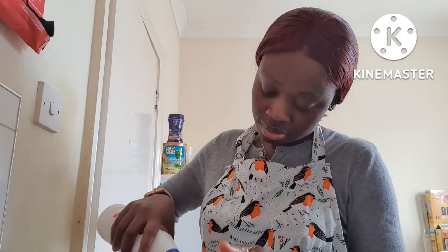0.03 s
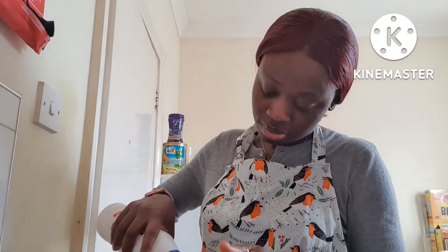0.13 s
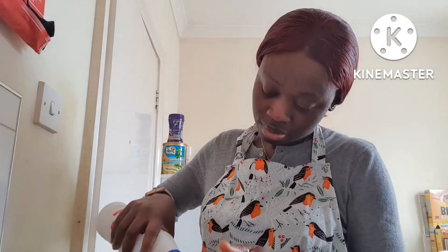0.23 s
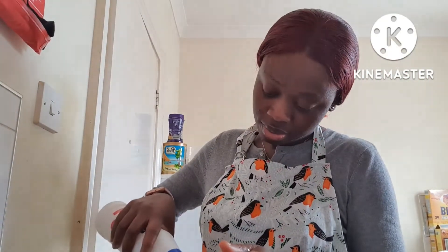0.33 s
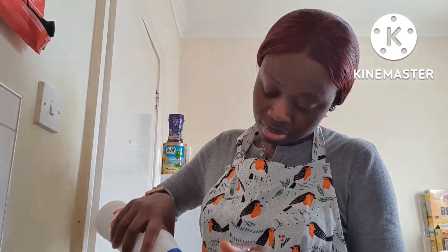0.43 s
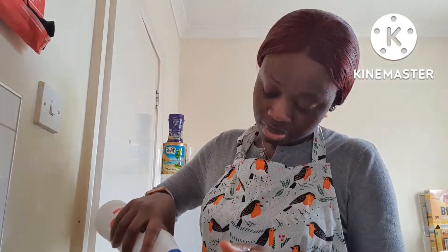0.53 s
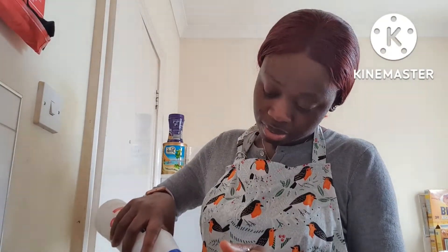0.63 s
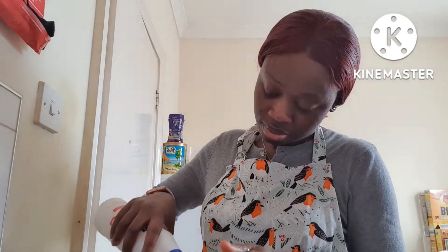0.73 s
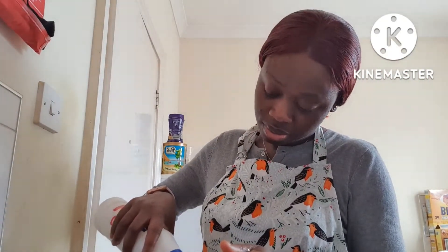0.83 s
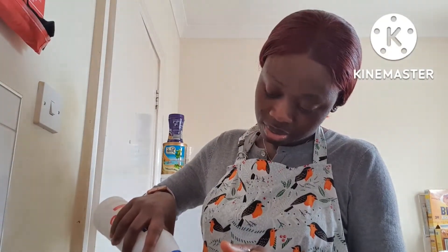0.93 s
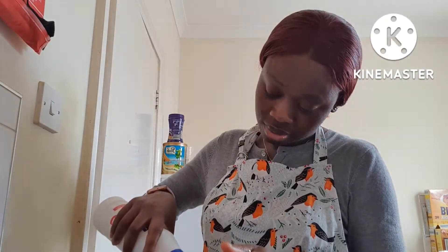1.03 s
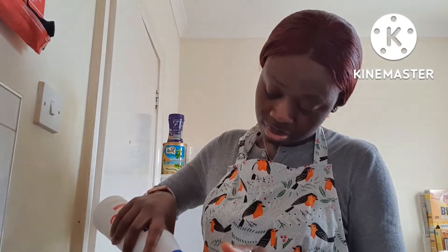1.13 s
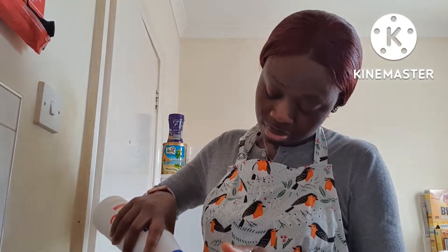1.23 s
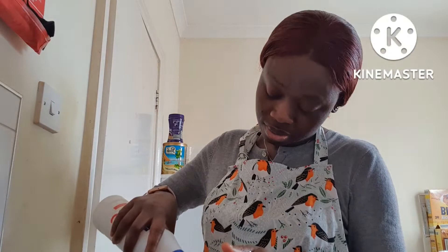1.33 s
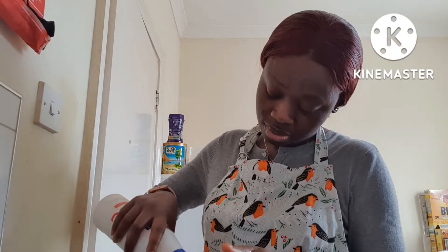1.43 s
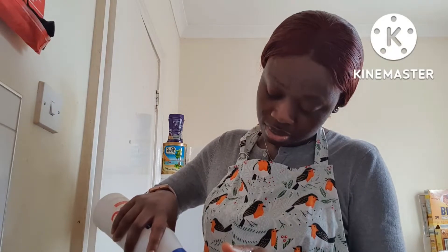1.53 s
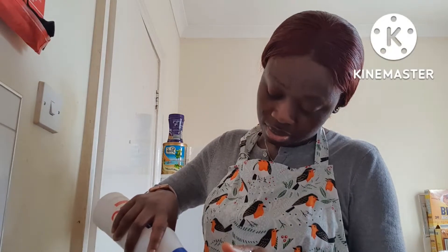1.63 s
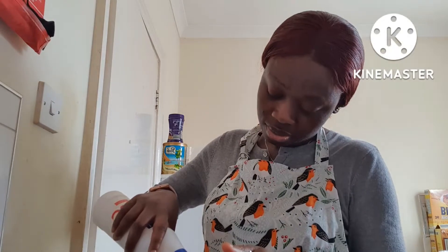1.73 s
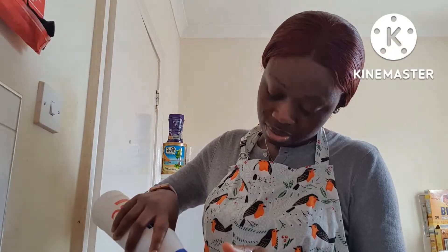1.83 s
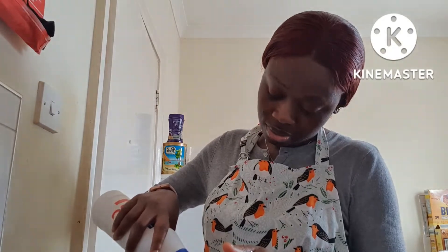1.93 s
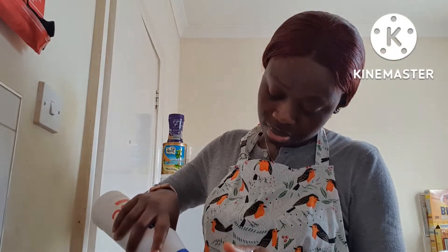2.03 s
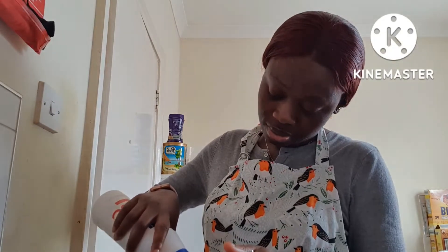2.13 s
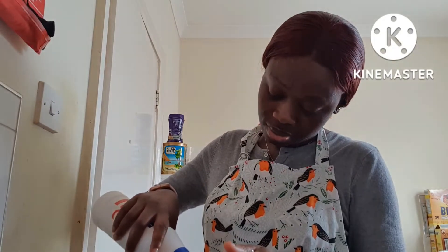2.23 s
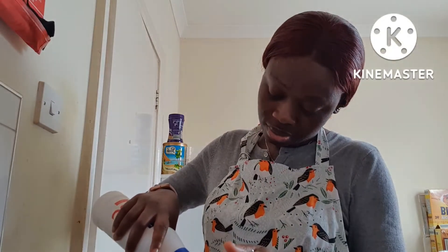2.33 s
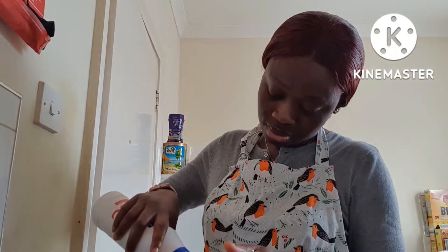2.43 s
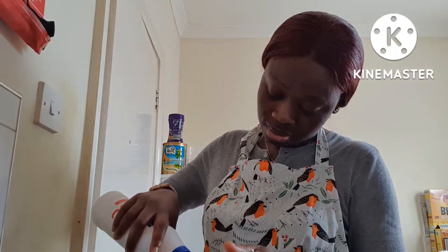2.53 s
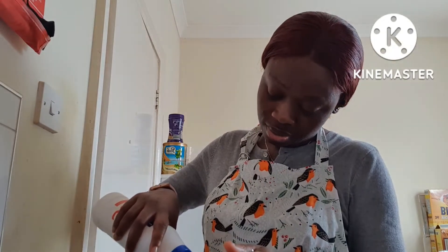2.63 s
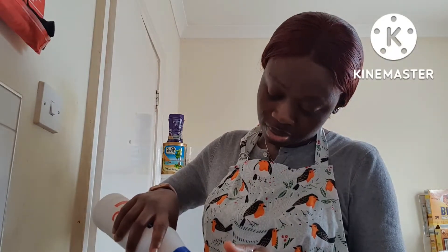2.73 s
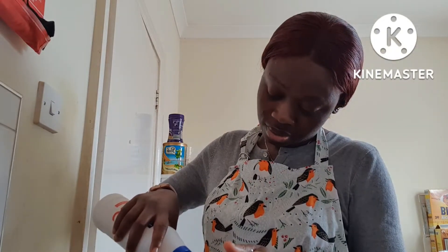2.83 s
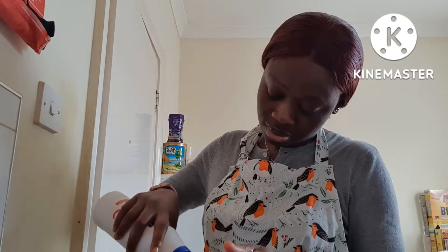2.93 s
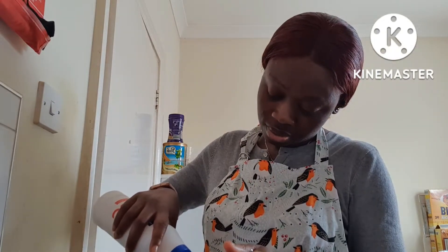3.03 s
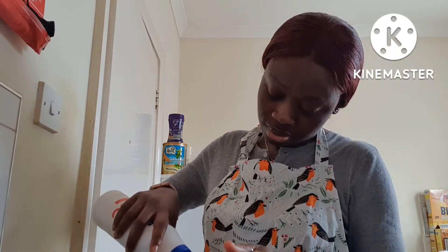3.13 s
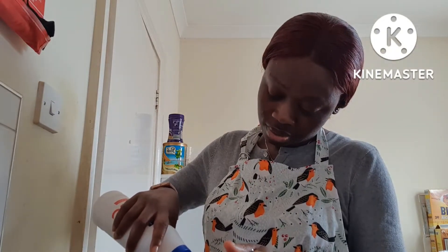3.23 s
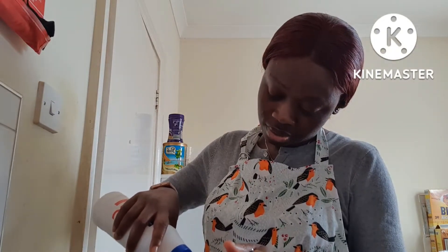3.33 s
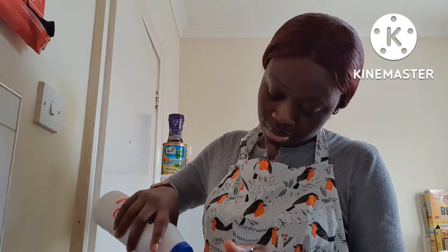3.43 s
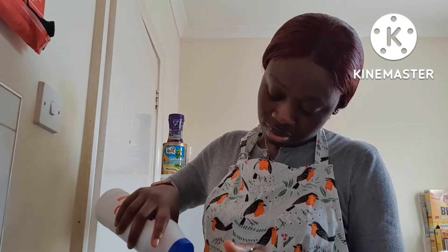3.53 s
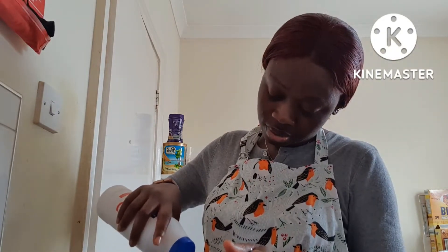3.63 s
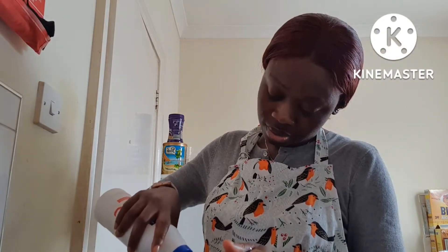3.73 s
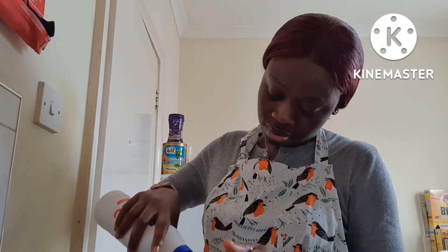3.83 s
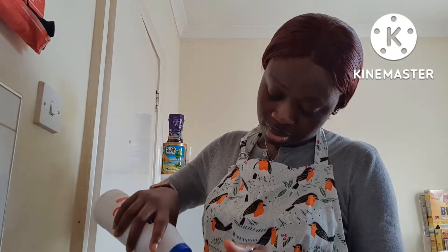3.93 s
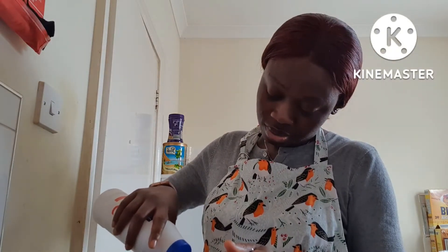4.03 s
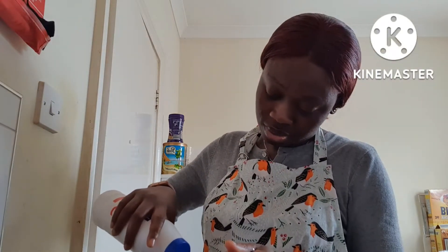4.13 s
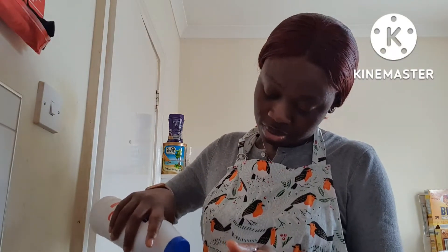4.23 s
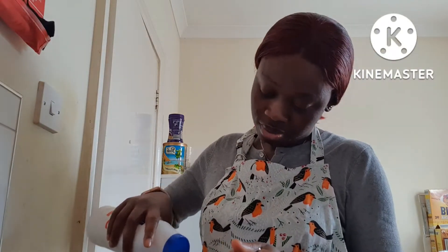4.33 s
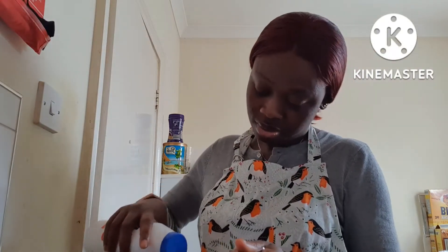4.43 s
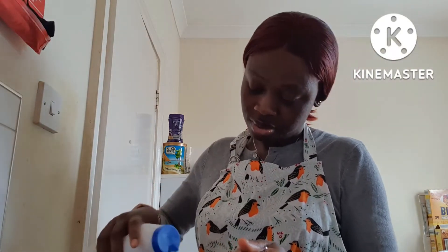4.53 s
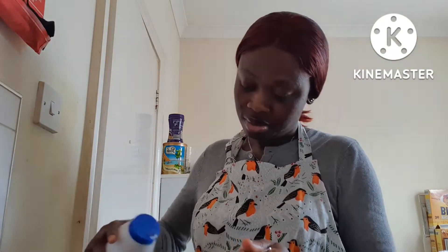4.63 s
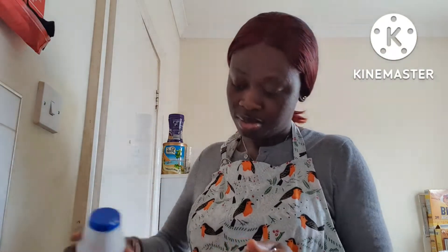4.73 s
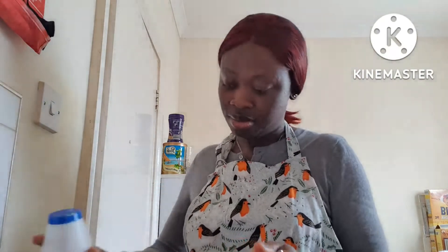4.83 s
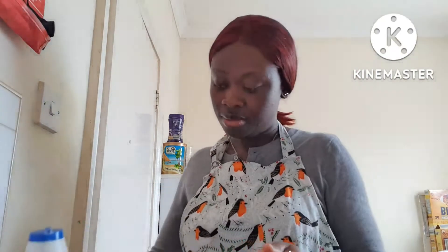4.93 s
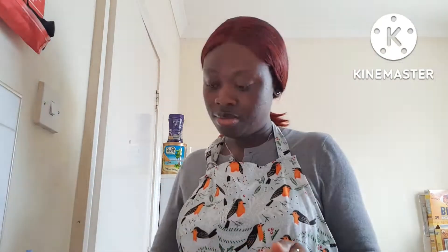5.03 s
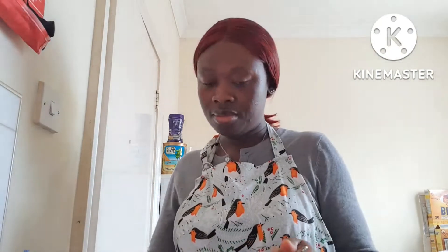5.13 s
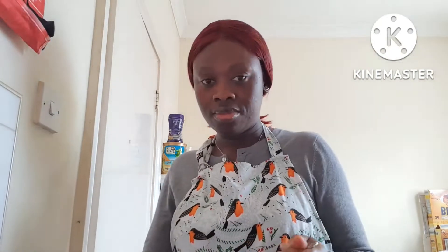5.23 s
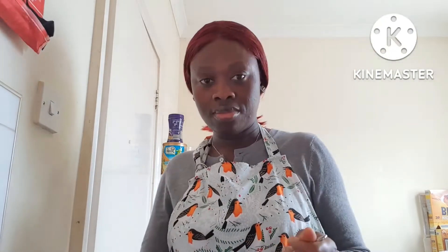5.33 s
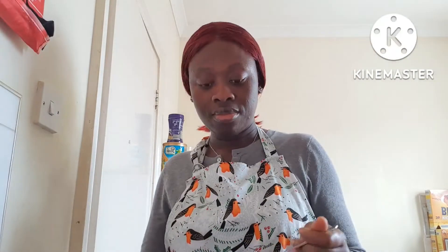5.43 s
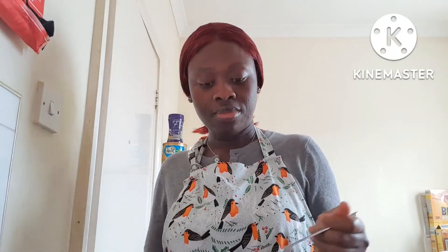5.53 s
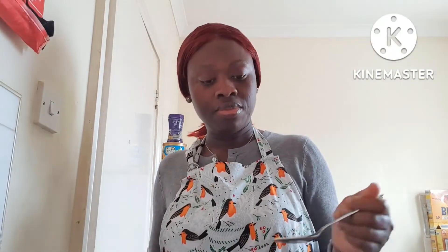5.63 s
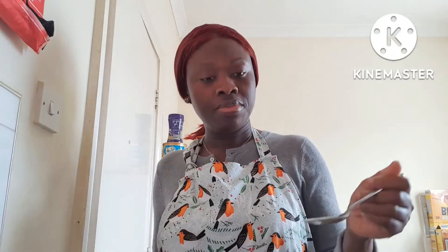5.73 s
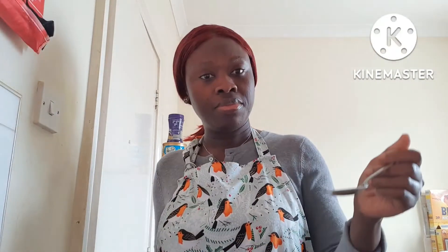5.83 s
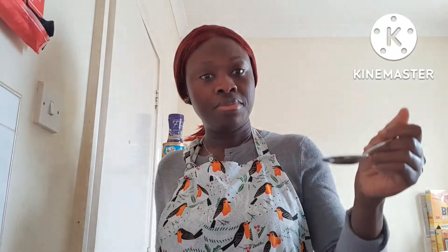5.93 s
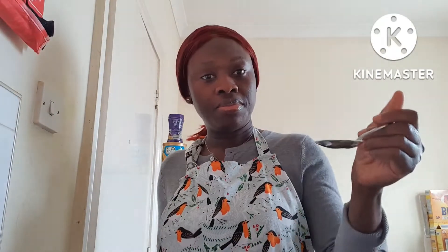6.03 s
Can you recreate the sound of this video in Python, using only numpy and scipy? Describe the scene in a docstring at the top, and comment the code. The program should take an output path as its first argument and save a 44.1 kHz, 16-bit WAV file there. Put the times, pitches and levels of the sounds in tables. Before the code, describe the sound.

A faint hiss and small shakes of salt in a plastic bottle, then a brief rush and a loud thud on a kitchen worktop.

```python
"""Salt slides along a tilted plastic bottle in a small kitchen, first in a stream, then in short shakes. Tiny
crystal impacts merge into a hiss, coloured by the air in the bottle, over the drumming of its wall. The bottle
is turned upright, the salt rushes back, and the bottle is knocked down on the worktop that carries the
microphone: a thud, a woody knock and a click. A few light bumps, a soft scrape as the hand lets go and sleeve
rustles follow; a fridge hums throughout."""
import sys
import numpy as np
from scipy import signal
from scipy.fft import rfft, irfft, next_fast_len
from scipy.io import wavfile
from scipy.ndimage import map_coordinates

SR = 44100
rng = np.random.default_rng(int(sys.argv[2]) if len(sys.argv) > 2 else 0)


def digitize_waveform(pressure):
    """Quantize a signal to 16-bit integers and store it at the path in sys.argv[1].

    Rows of a 2-D input are taken as channels; values are limited to [-1, 1].
    """
    field = np.atleast_2d(pressure).T
    bounded = np.clip(field, -1, 1)
    quanta = np.round(bounded * 32767).astype(np.int16)
    wavfile.write(sys.argv[1], SR, quanta)


N = 268657

# stereo image of diffuse sound: (frequency [Hz], left-right likeness [-1 to 1])
STEREO_LIKENESS = [(60, 0.99), (120, 0.95), (200, 0.6), (380, 0.58), (700, 0.33), (1300, -0.068),
                   (2400, 0.019), (15000, -0.082)]
# the fridge motor's tones: (frequency [Hz], rms level [dB])
FRIDGE_TONES = [(75.4, -63.5), (150.7, -64.5), (199.2, -70), (242.2, -80), (296.1, -68), (414.5, -71.5),
                (441.4, -66.5), (489.9, -78)]
# room tone, a low rumble and the air above it: (frequency [Hz], relative level [dB])
RUMBLE_COLOUR = [(20, -21), (35, -12), (50, 0), (72, 2), (95, 0), (120, -9), (150, -7), (200, -10),
                 (260, -17), (295, -11), (340, -17), (430, -12.5), (520, -17), (620, -29), (900, -55)]
AIR_COLOUR = [(500, -6.5), (650, -5), (800, -3), (1050, 0), (1200, -0.5), (1350, -16.5), (2100, -17.5),
              (3200, -22), (5000, -30.5), (8000, -36.5), (15500, -37)]
# envelope of the opening stream towards the spout: (time [s], level [dB])
STREAM_ENVELOPE = [(0.05, -79), (0.188, -58), (0.428, -56.5), (0.492, -62), (0.564, -59), (0.62, -66.5),
                   (0.762, -63), (0.888, -54), (0.978, -51), (1.038, -57), (1.138, -52), (1.3, -65.5)]
# each shake sends a small load along the wall: (time of full flow [s], level [dB], rise [s], hold [s])
SHAKE_CUES = [(1.339, -65, .02, 0.014), (1.445, -66.5, 0.02, 0.018), (1.56, -66, 0.031, 0.027),
              (1.682, -68, 0.023, .02), (1.758, -65.5, .028, 0.034), (1.883, -66.5, 0.039, 0.087),
              (2.109, -60.5, 0.036, .01), (2.269, -64.5, 0.028, 0.021), (2.627, -67, .02, .008),
              (2.749, -65.5, 0.02, 0.01), (3.487, -72.5, 0.019, .008), (3.699, -54.5, 0.017, 0.023)]
# hiss of sliding salt and the wall's dull drumming under it: (frequency [Hz], relative level [dB])
SLIDE_EQ = [(100, -12), (200, -10), (400, -3), (650, -9), (1000, -3.5), (1400, -12), (2100, -4.5),
            (3000, -1.5), (4200, -2.5), (6500, -6), (7900, -10.5), (8700, -9.5), (15500, -14)]
WALL_COLOUR = [(25, -25), (50, -10), (70, 8.5), (110, -6.5), (200, -6.5), (330, -12), (600, -25),
               (1200, -32)]
# air resonances of the bottle: (frequency [Hz], width [Hz], level against the hiss [dB])
BOTTLE_RESONANCES = [(1640, 33, -11.5), (2158, 34, 3), (2930, 170, -10.5), (4060, 150, -17),
                     (3930, 210, -1), (4970, 48, -7), (5340, 83, -13), (8800, 270, -25)]
# salt drops to the bottom, then settles: (time of full flow [s], level [dB], rise [s], hold [s])
FALL_CUES = [(4.832, -41, 0.067, 0.12), (5.245, -65.5, 0.025, .04)]
# hiss of falling salt: (frequency [Hz], relative level [dB])
FALL_EQ = [(300, -12.5), (700, -21), (1100, -14), (1400, -18), (1900, -12), (2500, -8), (3400, -5.5),
           (4300, -2), (5500, -6.5), (6800, -6.5), (8000, -12.5), (10500, -11.5), (15500, -14.5)]
# the bottle lands, rocks and is nudged: (time [s], thud gain [dB], knock gain [dB], click gain [dB])
CONTACT_CUES = [ (5.091, -11.7, -19.3, -22), (5.147, -27, -30.5, -44), (5.183, -30.5, -33, -39),
                (5.242, -35, -35, -50), (5.276, -34.5, -33.5, -47), (5.3025, -33, -32, -34.5),
                (5.424, -39.5, -41.5, -60), (5.433, -32, -46, -66), (5.463, -54, -39.5, -58),
                (5.48, -36, -53, -56)]
# the worktop's bending modes, and the knock of bottle on board: (frequency [Hz], level [dB], t60 [s])
WORKTOP_MODES = [(71, -1.5, .45), (110, 2.5, .15), (149, -7, .25), (195, -5, .06)]
KNOCK_MODES = [(325, -3, 0.214), (333, -3, 0.09), (384, -0.5, 0.17), (454, -5, 0.11), (498, -6.5, 0.13),
               (527, -12.5, 0.1), (620, 0, 0.033), (727, -13, 0.058), (740, -4.5, 0.081),
               (793, -7.5, 0.093), (819, -1, 0.083), (900, -10, 0.057), (950, -8, 0.064), (1040, -25, 0.17),
               (1185, -6, 0.031)]
# the click of plastic on board: (frequency [Hz], relative level [dB])
CLICK_EQ = [(150, -4), (450, 5), (850, 5), (1400, -2), (1950, 0), (2600, -3.5), (3800, -1), (5500, -8.5),
            (8000, -13.5), (15000, -17)]
# the kitchen's reverb: (frequency [Hz], t60 [s])
KITCHEN_DECAY = [(80, .3), (300, .38), (1000, .38), (4000, .38), (12000, .32)]
# a soft scrape as the hand lets go, then sleeve rustles: (time [s], level [dB], rise [s], fall [s], strongest
# frequency [Hz])
SLEEVE_CUES = [(5.465, -63, .025, 0.05, 2940), (5.785, -71, 0.021, 0.11, 4900),
               (5.985, -57, 0.017, 0.052, 3200)]

# how fast moving salt comes to rest, along the wall and on the heap at the bottom
SLIDE_STOP_DB_PER_S, FALL_STOP_DB_PER_S = 187, 133.5
DAMPED_RING = 0.62  # share of the ring time left once the bottle rests on the worktop
# click cut-off of the softest and of the hardest contact, and how steeply it follows the force
SOFT_CLICK_HZ, HARD_CLICK_HZ, HARDENING = 3500, 12500, 1.4
TOP_HZ = 15550


def amp(db):
    """Decibels to gain."""
    return 10 ** (np.asarray(db) / 20)


def unit(x):
    """Scaled to rms 1."""
    return x / np.sqrt(np.mean(x ** 2) + 1e-20)


def along(points, hz):
    """A curve through (frequency, value) points on a log axis, read at hz."""
    frequencies, values = np.transpose(points)
    return np.interp(np.log(hz + 1), np.log(frequencies + 1), values)


def clock():
    """The time of every sample, in seconds."""
    return np.arange(N) / SR


def wobble(rate):
    """A smooth random modulator, rate knots a second."""
    return map_coordinates(rng.standard_normal(int(N * rate / SR) + 4), [clock() * rate])


def filtered(x, response):
    """x through an EQ whose gain is response(hz)."""
    size = next_fast_len(x.shape[-1] + SR // 4)
    return irfft(rfft(x, size) * response(np.fft.rfftfreq(size, 1 / SR)), size)[..., :x.shape[-1]]


def diffuse(pair):
    """Two unrelated signals become a sound field: centred in the bass, wide in the treble."""
    width = lambda hz: np.arccos(np.clip(along(STEREO_LIKENESS, hz), -1, 1)) / 2
    mid, side = filtered(pair, lambda hz: np.array([np.cos(width(hz)), np.sin(width(hz))]))
    return np.array([mid + side, mid - side])


def noise(colour):
    """Diffuse coloured noise of rms 1."""
    return unit(diffuse(filtered(rng.standard_normal((2, N)), lambda hz: amp(along(colour, hz)))))


def fridge():
    """The motor hums, each tone wavering in level and phase."""
    return sum(amp(db + .6 * wobble(3)) * np.sqrt(2) * np.sin(2 * np.pi * hz * clock() + .35 * wobble(5))
               for hz, db in FRIDGE_TONES)


def room_tone():
    """A bed of low rumble and a soft rush of air."""
    return amp(-55.3) * noise(RUMBLE_COLOUR) + amp(-66.5) * noise(AIR_COLOUR)


def stream():
    """Envelope of the opening stream of salt, which swells, ebbs and runs out."""
    times, levels = np.transpose(STREAM_ENVELOPE)
    run_out_db = SLIDE_STOP_DB_PER_S * np.maximum(clock() - times[-1], 0)
    return amp(np.interp(clock(), times, levels) - run_out_db)


def surge(at, db, rise, hold, stop_db_per_s):
    """Envelope of one load of salt: it gathers speed, runs, and comes to rest."""
    t = clock() - at
    attack = np.exp(-(np.minimum(t, 0) / rise) ** 2 / 2)
    return attack * amp(db - stop_db_per_s * np.maximum(t - hold, 0))


def together(gains):
    """Unrelated flows add in power."""
    return np.sqrt(np.sum(np.square(gains), axis=0))


def grains(flow, per_second, spread_db):
    """Tiny crystal impacts of rms 1; more flow makes them denser."""
    chance = np.clip(per_second / SR * np.sqrt(np.abs(flow) / flow.max()), .02, 1)
    sizes = unit(rng.standard_normal((2, N)) * amp(spread_db * rng.standard_normal((2, N))))
    return sizes * (rng.random((2, N)) < chance) / np.sqrt(chance)


def bottle_air(hz):
    """The air in the bottle resonates, adding narrow peaks to the hiss."""
    return 1 + sum(amp(db) * 1j * hz * width / (centre ** 2 - hz ** 2 + 1j * hz * width)
                   for centre, width, db in BOTTLE_RESONANCES)


def sliding_salt():
    """Crystals scrape along the wall and make it drum; a slow trickle is duller than a full slide."""
    flow = together([stream()] + [surge(*shake, SLIDE_STOP_DB_PER_S) for shake in SHAKE_CUES])
    impacts = grains(flow, per_second=25000, spread_db=2)
    hiss = unit(diffuse(filtered(impacts, lambda hz: amp(along(SLIDE_EQ, hz)) * bottle_air(hz))))
    dull = filtered(hiss, lambda hz: 1 / (1 + (hz / 7000) ** 4))
    brightness = (np.abs(flow) / flow.max()) ** 0.39
    scrape = amp(4.0 + 0.19 * wobble(45.26)) * (dull + brightness * (hiss - dull))
    drumming = amp(3) * noise(WALL_COLOUR)
    return flow * (scrape + drumming)


def falling_salt():
    """The whole load of salt rushes down to the bottom as the bottle is righted."""
    flow = together([surge(*fall, FALL_STOP_DB_PER_S) for fall in FALL_CUES])
    impacts = grains(flow, per_second=30000, spread_db=2)
    hiss = unit(diffuse(filtered(impacts, lambda hz: amp(along(FALL_EQ, hz)))))
    return amp(3.5 + 0.26 * wobble(54)) * flow * hiss


def ring(modes, t, ring_share, scatter_db):
    """Damped modes, struck at new strengths each time; neighbours swing in opposite directions."""
    out = np.zeros_like(t)
    for k, (hz, db, t60) in enumerate(modes):
        envelope = amp(db + scatter_db * rng.standard_normal() - 60 * t / (t60 * ring_share))
        out += (-1) ** k * envelope * np.sin(2 * np.pi * hz * t)
    return out


def kitchen_reverb():
    """One second of the room's impulse response: each frequency dies at its own speed."""
    hz, t, spectrum = signal.stft(rng.standard_normal((2, SR)), SR, nperseg=256)
    decay = amp(-60 * t / along(KITCHEN_DECAY, hz)[:, None])
    tail = signal.istft(spectrum * decay, SR, nperseg=256)[1]
    tail = np.pad(diffuse(tail), ((0, 0), (SR // 300, 0)))[:, :SR]  # pre-delay
    return tail / np.linalg.norm(tail[0])


def from_left(x):
    """The bottle stands to the left, so its sound reaches the right channel later."""
    return np.array([x, np.pad(x, (SR // 2800, 0))[:SR]])


def plastic_click(t, db):
    """Plastic meets board in a short crack with a room tail; softer contacts click duller."""
    hardest_db = CONTACT_CUES[0][3]
    cutoff_hz = SOFT_CLICK_HZ + (HARD_CLICK_HZ - SOFT_CLICK_HZ) * amp(db - hardest_db) ** HARDENING
    crack = rng.standard_normal(SR) * amp(-60 * t / 0.019) * (1 - np.exp(-t / 0.0013))
    tail = amp(-2.5) * np.linalg.norm(crack) * kitchen_reverb()
    tone = lambda hz: amp(along(CLICK_EQ, hz)) / np.sqrt(1 + (hz / cutoff_hz) ** 4)
    return amp(db + 10.5) * filtered(from_left(crack) + tail, tone)


def bottle_on_worktop():
    """Each contact layers the thud of the bending worktop, the bottle's knock and a click."""
    out, t = np.zeros((2, N + SR)), np.arange(SR) / SR
    low_cut = signal.butter(4, 36, "highpass", fs=SR, output="sos")
    landing = CONTACT_CUES[0][0]
    for at, thud_db, knock_db, click_db in CONTACT_CUES:
        ring_share = DAMPED_RING if at > landing else 1
        thud = amp(thud_db) * signal.sosfilt(low_cut, ring(WORKTOP_MODES, t, ring_share, scatter_db=.3))
        knock = amp(knock_db - 6.5) * ring(KNOCK_MODES, t, ring_share, scatter_db=4.0)
        direct = from_left(thud + knock) * amp([[.4], [-.4]])  # a touch louder on the left
        send = amp(-5) * knock + amp(-20) * thud
        reverb = signal.fftconvolve(send[None], kitchen_reverb(), axes=1)[:, :SR]
        start = round(at * SR)
        out[:, start:start + SR] += direct + reverb + plastic_click(t, click_db)
    return out[:, :N]


def sleeve():
    """A soft scrape as the hand lets go of the bottle, then cloth brushes as the arm lifts."""
    out = np.zeros((2, N))
    for at, db, rise, fall, hz in SLEEVE_CUES:
        t = clock() - at
        stroke = np.exp(-(np.minimum(t, 0) / rise) ** 2 / 2 - np.maximum(t, 0) / fall)
        cloth = noise([(hz / 6, -3), (hz / 2, -2), (hz, 0), (hz * 2, -11), (hz * 3.6, -26)])
        out += amp(db) * stroke * cloth
    return out


def scene():
    """The mix: salt, bottle and sleeve over the kitchen's ambience."""
    return sliding_salt() + falling_salt() + bottle_on_worktop() + sleeve() + fridge() + room_tone()


def record(dry):
    """A brick-wall high cut on the whole mix."""
    return filtered(dry, lambda hz: 1 / (1 + (hz / TOP_HZ) ** 200))


dry = scene()
out = record(dry)
digitize_waveform(out)
```